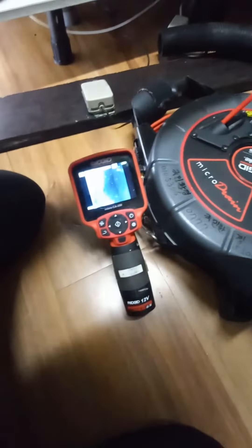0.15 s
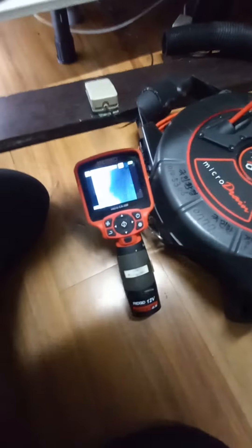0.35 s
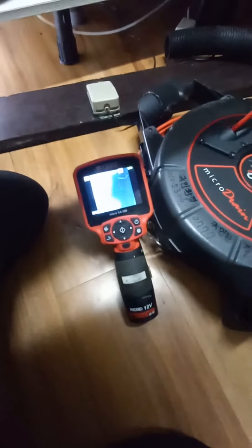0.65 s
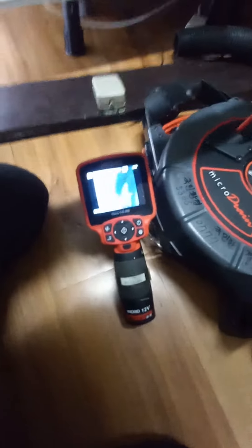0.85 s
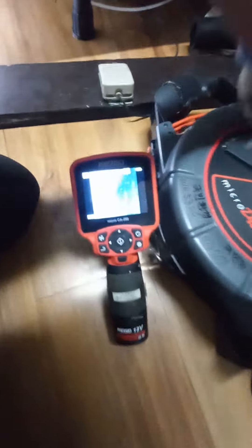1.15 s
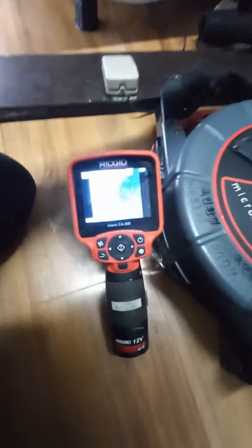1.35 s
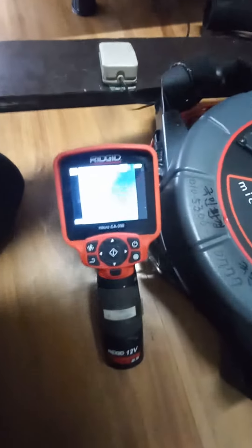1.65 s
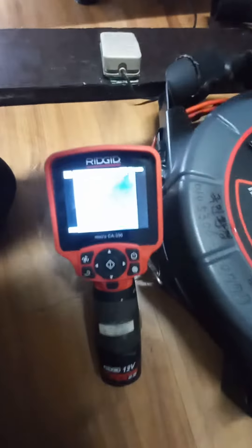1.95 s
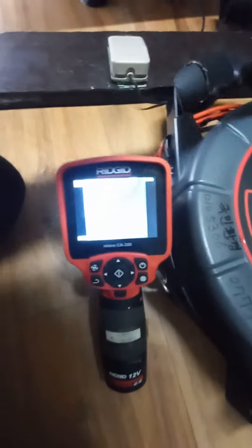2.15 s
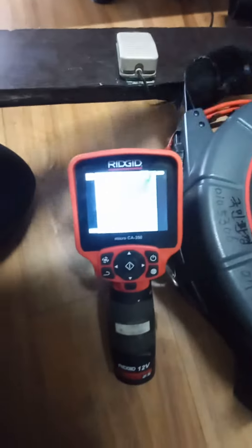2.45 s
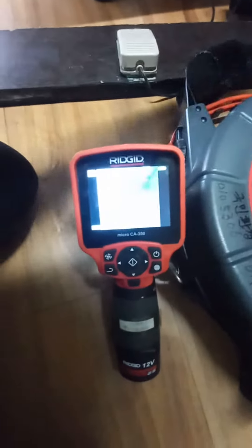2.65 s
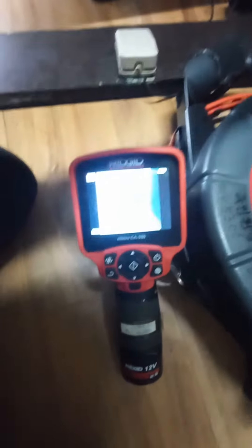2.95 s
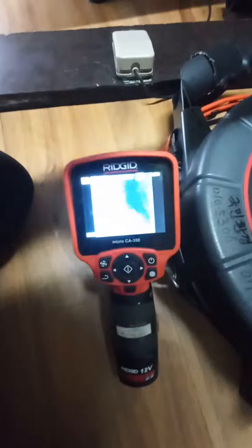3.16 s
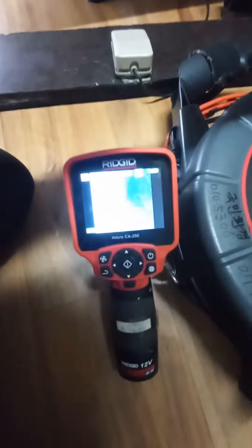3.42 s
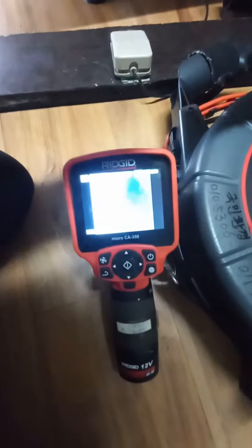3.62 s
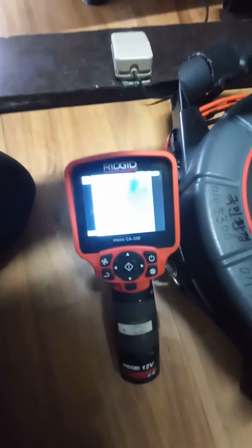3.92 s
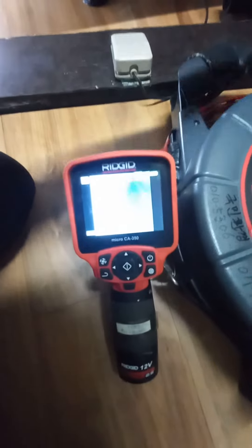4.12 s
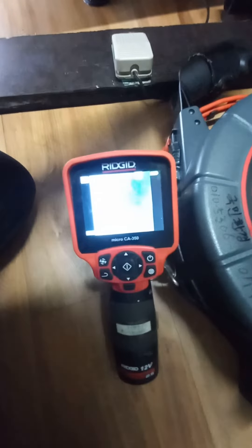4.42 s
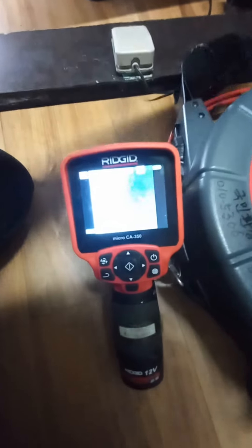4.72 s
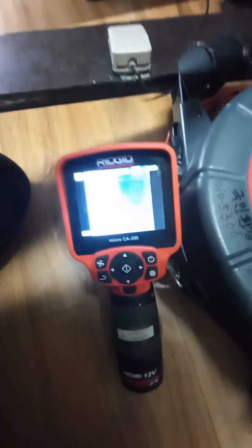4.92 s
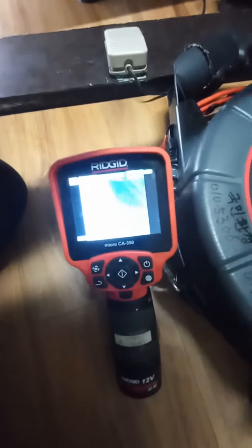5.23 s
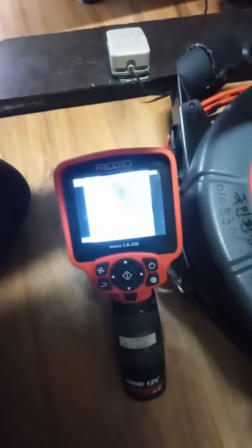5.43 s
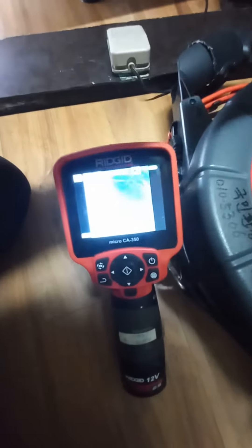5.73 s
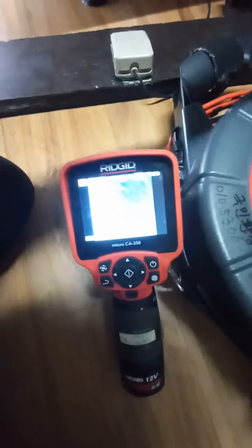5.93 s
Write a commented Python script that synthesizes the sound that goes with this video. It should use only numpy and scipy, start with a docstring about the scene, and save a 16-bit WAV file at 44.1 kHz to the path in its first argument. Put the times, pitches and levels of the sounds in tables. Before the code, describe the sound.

Steady hiss of water in a pipe while a cable is fed in bumping, scraping strokes off a hollow plastic reel, fading to faint rubs.

```python
"""Water hisses throughout in a pipe (banded noise, air resonances, soft bubbles), the hiss sinking a
little from 0.9 to 3.4 s. From 0.6 s a push cable is fed in strokes down a ribbed drain hose off a hollow
plastic reel on a wooden floor: rib blows and hard bumps ring the drum modes, the jacket scrapes (gritty
noise), the housing ticks (modes). Strokes are heaviest to about 2.5 s, then fainter, with bumps and ticks
again at 4.6-5.5 s and a weak last rub at 5.8 s. A hand-held phone hears the reel on its right."""
import sys
import numpy as np
from scipy import signal
from scipy.fft import rfft, irfft, next_fast_len
from scipy.io import wavfile
from scipy.ndimage import uniform_filter1d

SR = 44100
rng = np.random.default_rng(int(sys.argv[2]) if len(sys.argv) > 2 else 0)


def int16_out(signal):
    """Quantize to a 16-bit WAV file."""
    q = np.round(np.clip(np.atleast_2d(signal).T, -1, 1) * 32767)
    wavfile.write(sys.argv[1], SR, q.astype(np.int16))


N = 268117

# cable strokes: start t/s, speeding up t/s, running t/s, slowing t/s, boom level/dB, rub level/dB
CABLE_STROKES = [(0.56, 0.28, .2, .24, -25.5, -32.5), (1.3, 0.21, 0.056, 0.11, -28.5, -42),
                 (1.68, 0.27, .19, .08, -24, -35), (2.2, 0.2, 0.09, 0.18, -33, -42),
                 (2.85, 0.11, .04, 0.15, -38, -61), (3.1, 0.044, 0.17, 0.17, -39.5, -47),
                 (3.46, 0.26, .15, .07, -35, -40), (3.98, .04, .04, .05, -46, -43),
                 (4.15, 0.13, .04, .13, -43, -47), (4.66, 0.075, 0.039, 0.11, -34.5, -39),
                 (4.82, 0.11, 0.07, 0.19, -35.5, -43.5), (5.09, 0.061, 0.016, 0.057, -38.5, -42.5),
                 (5.2, 0.097, 0.077, 0.092, -33, -38), (5.41, 0.047, .06, 0.2, -37, -47),
                 (5.75, 0.18, .08, .12, -53, -45.5)]
# hard bumps of the cable in the drum: t/s, nominal level/dB, lean to the deepest modes/dB
DRUM_BUMPS = [(0.541, -22, 0), (0.668, -25, -6), (0.716, -14, -1.5), (0.732, -21, -4), (0.747, -19, -5),
              (0.77, -17, -1), (0.785, -16, 7), (0.798, -15, -4), (0.82, -17.5, 10), (0.846, -7.5, 4),
              (0.859, -5, 5), (0.873, -8, 0), (0.883, -11, 3), (0.902, -11.5, 7), (0.918, -7.5, -3),
              (0.945, -12.5, 1), (0.964, -10, -4), (0.981, -16, -8), (1.007, -17, 10), (1.049, -10, 3),
              (1.073, -13, 6), (1.09, -14.5, -4), (1.106, -18, 7), (1.139, -16.5, -2.5), (1.46, -25, 4),
              (1.497, -17, 3.5), (1.527, -16, 1.5), (1.548, -21, -4), (1.563, -16, 8), (1.589, -28, 0),
              (1.803, -20.5, -4), (1.833, -18.5, 0), (1.867, -12, 0), (1.884, -9.5, 3), (1.911, -8, 2),
              (1.928, -7, -2), (1.949, -14, 2.5), (1.977, -9.5, 4), (2.0, -7.5, -3), (2.021, -9, -0.5),
              (2.055, -20, -6), (2.074, -12.5, -2.5), (2.095, -18, -3), (2.113, -12, 0.5), (2.14, -31, -5),
              (2.42, -31, 3), (2.479, -23.5, 4), (3.337, -27, 4.5), (3.691, -25, -2), (3.721, -23.5, -6),
              (3.756, -31, 0), (3.791, -27, -7), (3.838, -23, 4.5), (3.862, -27, -5), (4.618, -24.5, -1),
              (4.735, -20, -2), (4.768, -20, -5.5), (4.956, -25, 2), (5.153, -25.5, 5), (5.314, -25, -1),
              (5.34, -31, -10), (5.39, -26, 3), (5.448, -11.5, 1.5), (5.497, -16.5, -3)]
# drum modes: f/Hz, relative level/dB, t60/s, left minus right/dB
DRUM_MODES = [(108, -15.5, 0.14, -2), (199, 2, 0.125, 0), (251, 1, 0.125, -2.5), (317, -3, 0.1, -3.5),
              (428, -15, 0.089, -3), (517, -12, 0.079, 7.5), (586, -13.5, 0.057, 0), (711, -16.5, 0.056, 5)]
# hard slips of the jacket, short bursts of grit: t/s, nominal level/dB
JACKET_SLIPS = [(0.772, -32), (0.885, -33), (0.945, -35), (0.99, -33), (1.038, -30.5), (1.09, -29),
                (1.108, -38), (1.16, -38), (1.57, -36), (1.878, -27.5), (1.955, -35), (2.03, -31),
                (2.075, -36), (2.108, -30.5), (2.145, -42), (3.715, -31), (3.862, -34)]
# scrape colour: f/Hz, relative level/dB
SCRAPE_COLOUR = [(350, -8.5), (600, 2), (900, -9.5), (1200, -3.5), (1550, -9), (1850, -7.5), (2500, -10.5),
                 (4500, -16), (6000, -50)]
# scrape balance: f/Hz, left minus right/dB
SCRAPE_BALANCE = [(500, 0), (1000, 1), (1900, -8.5), (3500, 10)]
# ticks on the housing: t/s, nominal level/dB, brightness/dB, extra edge in the top modes/dB
HOUSING_TICKS = [(0.656, -28, 8, -1), (0.698, -15, -1, 0), (0.795, -6.5, -1, -6), (0.805, -15, -4, -6),
                 (0.887, -17.5, -4, 16), (1.105, -34, 4, 8), (1.508, -13, 3, -1), (1.559, -23, 6.5, 11),
                 (1.59, -27.5, 9, 0), (1.79, -28.5, 7, -3), (1.883, -34, -2, 5), (1.942, -18.5, 6, -3),
                 (2.003, -24, -5, 0), (2.052, -27, 10, 0), (2.115, -19.5, 6.5, 7), (2.147, -37, 5, 0),
                 (4.039, -26, 1, 3), (4.733, -20.5, 1, -8), (4.771, -13, 2, -1)]
# housing modes: f/Hz, relative level/dB, t60/s, left minus right/dB
HOUSING_MODES = [(579, 4, 0.043, -5), (713, 1, 0.047, -8), (830, -17, 0.032, 1), (1155, 10.5, 0.036, -9),
                 (1270, 10, 0.059, 5), (1430, 6, 0.031, -15), (1460, -3, 0.03, -4), (1866, 0, 0.03, -7),
                 (2050, -8, .03, 1), (2440, -10, .03, 8)]
# level of the hiss, sinking a little after 0.9 s and returning near 3.4 s: t/s, level/dB
HISS_LEVEL = [(0, -32.5), (.86, -32.5), (.98, -34.5), (3.3, -34.5), (3.55, -33), (6.08, -33.4)]
# water colour: f/Hz, relative level/dB
WATER_COLOUR = [(30, -38), (55, -21), (105, 1), (150, -7.5), (280, -2.5), (450, -13), (1000, -13.5),
                (1400, -15.5), (2600, -17), (4800, -13), (9500, -14.5), (12600, -11.5), (16000, -16)]
# water balance: f/Hz, left minus right/dB
WATER_BALANCE = [(60, 3), (110, -0.5), (200, -1), (380, -2.5), (700, 0.5), (1290, -3.5), (2380, -0.5),
                 (4400, 2.5), (8120, 4.5), (15000, 8)]
# likeness of the two water channels: f/Hz, shared power (0-1)
WATER_LIKENESS = [(30, .8), (100, .94), (300, .94), (420, .65), (600, .7), (900, .5), (1200, .15),
                  (4000, .03)]
# air resonances of the pipe: f/Hz, width/Hz, lift/dB
PIPE_RESONANCES = [(530, 35, 7), (693, 97, 6.5), (860, 62, 9), (1780, 130, 5.5), (2060, 370, 4),
                   (4600, 540, 0.5), (7400, 930, 3.5)]

T_S = np.arange(N) / SR
FFT_LEN = next_fast_len(N + SR // 4)
F_HZ = np.maximum(np.arange(FFT_LEN // 2 + 1) * SR / FFT_LEN, 1.)

# boom: power of cable speed (0-1); rub: sets in near a threshold speed, then levels off
BOOM_POWER, RUB_POWER, RUB_FROM_SPEED = 1.22, 2.3, 0.66
BOOM_IDLE_DB, RUB_IDLE_DB = -59.5, -46  # the slack cable still rustles
RIBS_PER_S, RIB_JITTER = 56, .3  # median rate; log-normal spread of the gaps
DRUM_RISE_S, HOUSING_RISE_S = 0.0037, 0.00025  # the air in the drum takes a moment to build up
SLIP_RISE_S, SLIP_FADE_S = 0.0014, 0.023
# left microphone hears later, except in the bass that fills the room
REEL_LAG_S, WATER_LAG_S, LAG_FROM_HZ = 0.00017, 0.0004086, 620
TOP_HZ = 15870


def drum(boom_db):
    """Uneven rib blows and a fine grind ring the drum modes; hard bumps stand out."""
    gaps_s = np.exp(RIB_JITTER * rng.standard_normal(600)) / RIBS_PER_S
    times_s = np.cumsum(gaps_s)
    ribs = unit(blows(times_s[times_s < N / SR], 1.0))
    drive = undb(-6.0) * ribs + rng.standard_normal(N)
    drive_rms = np.sqrt(np.mean(ring(drive, DRUM_MODES, 0.0009, DRUM_RISE_S) ** 2))
    rolling = ring(drive * undb(boom_db) / drive_rms, DRUM_MODES, 0.00088, DRUM_RISE_S)

    t_s, db, deep_db = np.transpose(DRUM_BUMPS)
    low_blows = blows(t_s, undb(db - 7.0 + deep_db))
    high_blows = blows(t_s, undb(db - 6.0 - deep_db))
    low_bumps = ring(low_blows, modes_between(DRUM_MODES, 0, 225), 0.00085, DRUM_RISE_S)
    high_bumps = ring(high_blows, modes_between(DRUM_MODES, 225, SR), 0.00094, DRUM_RISE_S)

    # a small drum radiates little deep bass
    return highpass(rolling + low_bumps + high_bumps, 2, 125)


def scrape(rub_db):
    """Jacket friction: patchy noise, roughened by many small slips and burst by hard ones."""
    spectra = hiss(over_hz(SCRAPE_COLOUR), over_hz(SCRAPE_BALANCE), 0.2)
    noise = unit(irfft(spectra, FFT_LEN)[:, :N])

    where, size = rng.random((1200, 2)).T
    small_blows = blows(where * N / SR, undb(7.0 * size))
    small_slips = signal.fftconvolve(small_blows, np.exp(-T_S[:900] / 0.01))[:N]
    roughness = unit(1.05 + unit(small_slips))

    t_s, db = np.transpose(JACKET_SLIPS)
    burst_t_s = T_S[:SR // 8]
    burst = (1 - np.exp(-burst_t_s / SLIP_RISE_S)) * np.exp(-burst_t_s / SLIP_FADE_S)
    hard_slips = signal.fftconvolve(blows(t_s, undb(db)), burst)[:N]

    patchy_rub = undb(rub_db + 1.3 * walk(25))
    return noise * roughness * np.hypot(patchy_rub, hard_slips)


def ticks():
    """Short hollow housing ticks; where the cable lands decides which modes speak."""
    t_s, db, bright_db, edge_db = np.transpose(HOUSING_TICKS)
    low_blows = blows(t_s, undb(db - 5.0 - bright_db))
    mid_blows = blows(t_s, undb(db - 7.0 + bright_db))
    high_blows = blows(t_s, undb(db - 19.5 + bright_db + edge_db))
    low = ring(low_blows, modes_between(HOUSING_MODES, 0, 950), 0.00075, HOUSING_RISE_S)
    mid = ring(mid_blows, modes_between(HOUSING_MODES, 950, 1640), 0.00032, HOUSING_RISE_S)
    high = ring(high_blows, modes_between(HOUSING_MODES, 1640, 9000), 0.00022, HOUSING_RISE_S)
    # the small part has no bass
    return highpass(low + mid + high, 4, 480)


def water():
    """Broad hiss lifted by the pipe's air resonances; each half-octave band flickers alone."""
    lift_db = sum(db / (1 + (2 * (F_HZ - f_hz) / width_hz) ** 2)
                  for f_hz, width_hz, db in PIPE_RESONANCES)
    spectra = hiss(over_hz(WATER_COLOUR) + lift_db, over_hz(WATER_BALANCE), over_hz(WATER_LIKENESS))
    half_octaves = 2 * np.log2(F_HZ / 40)
    out = 0
    for k in range(19):
        band = np.cos(np.pi / 2 * np.clip(half_octaves - k, -1, 1)) ** 2
        flicker_db = (2.24 - 0.067 * k) * walk(60)
        out = out + irfft(spectra * band, FFT_LEN)[:, :N] * undb(flicker_db)
    t_s, db = np.transpose(HISS_LEVEL)
    return unit(out) * undb(np.interp(T_S, t_s, db))


def bubbles():
    """Soft bubbles in the pipe mouth: decaying sines gliding up, scattered left and right."""
    out = np.zeros((2, N + SR))
    t_s = T_S[:SR // 8]
    sides = np.array([[1], [-1]])
    for when, pitch, size, side in rng.random((70, 4)):
        f_hz = 480 * 2.2 ** pitch
        start = int(when * N)
        envelope = np.exp(-t_s * f_hz / 14) * (1 - np.exp(-t_s / 0.0036))
        tone = np.sin(2 * np.pi * f_hz * (t_s + 1.63 * t_s ** 2)) * envelope
        level_db = -50.0 + 6.4 * size + 12.0 * (side - .5) * sides
        out[:, start:start + len(t_s)] += tone * undb(level_db)
    return out[:, :N]


def strokes(column, law, idle_db):
    """Level/dB of a sound following cable speed (0-1): ramp up, run, ramp down."""
    energy = undb(2 * idle_db)
    for row in CABLE_STROKES:
        speed = np.interp(T_S, np.cumsum(row[:4]), [0, 1, 1, 0])
        energy = energy + (undb(row[column]) * law(speed)) ** 2
    return 10 * np.log10(energy)


def ring(blow_train, modes, push_s, rise_s):
    """Soft pushes ring decaying modes into both channels; a unit blow peaks near 1."""
    t_s = T_S[:SR // 3]
    body = 0
    for f_hz, db, t60_s, pan_db in modes:
        gains = undb(db + np.array([[pan_db], [-pan_db]]) / 2)
        body = body + gains * np.sin(2 * np.pi * f_hz * t_s) * 1000. ** (-t_s / t60_s)
    body = body * (1 - np.exp(-t_s / rise_s))
    push = np.hanning(int(push_s * SR) + 3)
    body = signal.fftconvolve(body, push[None], axes=1)
    return signal.fftconvolve(blow_train[None], body / np.abs(body).max(), axes=1)[:, :N]


def modes_between(modes, from_hz, to_hz):
    """Modes with from_hz <= f < to_hz."""
    return [mode for mode in modes if from_hz <= mode[0] < to_hz]


def blows(times_s, gains):
    """Impulses at the given times."""
    out = np.zeros(N)
    places = np.clip((np.asarray(times_s) * SR).astype(int), 0, N - 1)
    np.add.at(out, places, gains)
    return out


def hiss(db, pan_db, alike):
    """Left and right noise spectra with a colour, a balance and a shared part."""
    both, left, right = (rfft(rng.standard_normal(FFT_LEN)) for _ in range(3))
    alike = np.clip(alike, 0, 1)
    pair = np.sqrt(alike) * both + np.sqrt(1 - alike) * np.array([left, right])
    return pair * undb(db + np.array([pan_db, -pan_db]) / 2)


def walk(rate_hz):
    """Random levels held 1 / rate_hz and smoothed twice; rms 1."""
    k = int(SR / rate_hz)
    steps = np.repeat(rng.standard_normal(N // k + 1), k)
    return unit(uniform_filter1d(uniform_filter1d(steps, k), k)[:N])


def over_hz(table):
    """A (f/Hz, value) table read on a log-frequency axis."""
    f_hz, value = np.transpose(table)
    return np.interp(np.log(F_HZ), np.log(f_hz), value)


def lag(x, lag_s):
    """Delay the left channel by the path between the microphones, fading out in the bass."""
    phase_rad = 2 * np.pi * F_HZ * lag_s / (1 + (LAG_FROM_HZ / F_HZ) ** 4)
    left = irfft(rfft(x[0], FFT_LEN) * np.exp(-1j * phase_rad), FFT_LEN)[:N]
    return np.array([left, x[1]])


def highpass(x, order, f_hz):
    """Butterworth high-pass."""
    return signal.sosfilt(signal.butter(order, f_hz, "high", fs=SR, output="sos"), x)


def undb(db):
    """Decibels to gain."""
    return 10 ** (np.asarray(db) / 20)


def unit(x):
    """Scale to rms 1."""
    return x / np.sqrt(np.mean(x ** 2))


def scene():
    """Reel and water as they reach the two microphones."""
    boom_db = strokes(4, lambda v: v ** BOOM_POWER, BOOM_IDLE_DB)
    rub_db = strokes(5, lambda v: np.tanh((v / RUB_FROM_SPEED) ** RUB_POWER), RUB_IDLE_DB)
    reel = drum(boom_db) + scrape(rub_db) + ticks()
    pipe = water() + bubbles()
    return lag(reel, REEL_LAG_S) + lag(pipe, WATER_LAG_S)


def record(dry):
    """The phone thins the deep bass and cuts the top."""
    thin = highpass(dry, 5, 62)
    return signal.sosfilt(signal.ellip(12, .2, 80, TOP_HZ, fs=SR, output="sos"), thin)


dry = scene()
out = record(dry)
int16_out(out)
```